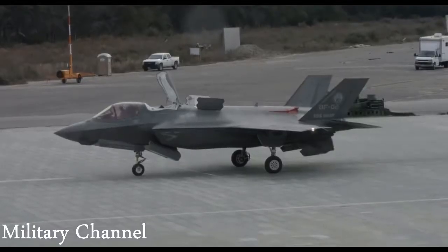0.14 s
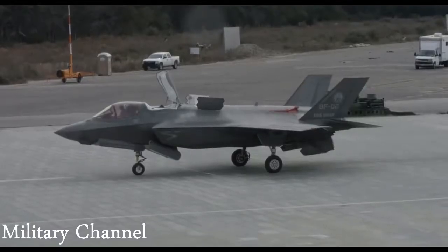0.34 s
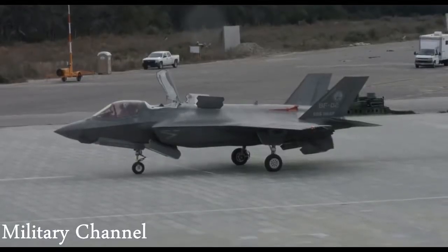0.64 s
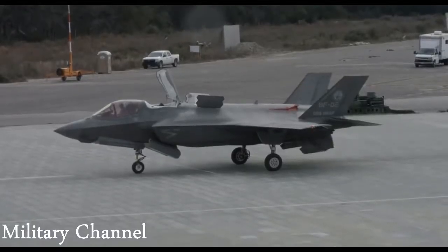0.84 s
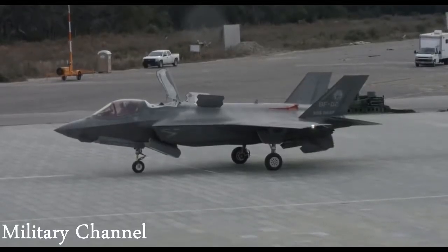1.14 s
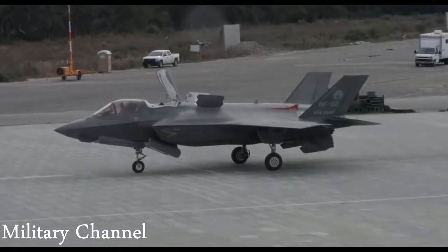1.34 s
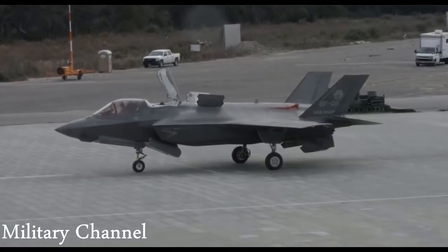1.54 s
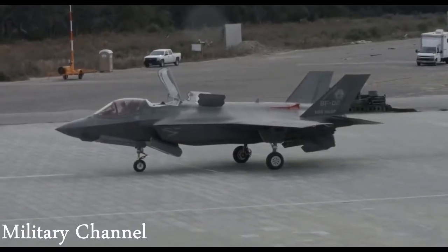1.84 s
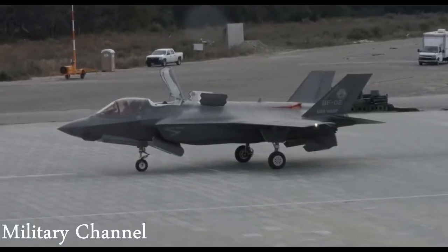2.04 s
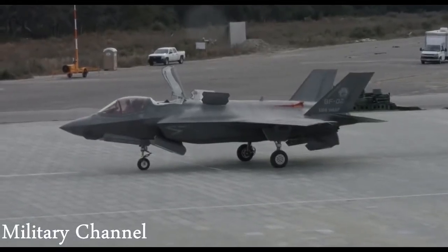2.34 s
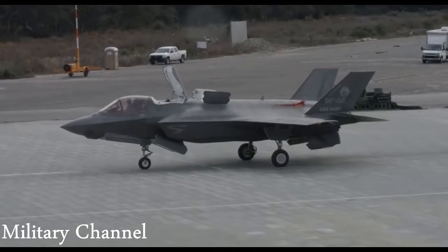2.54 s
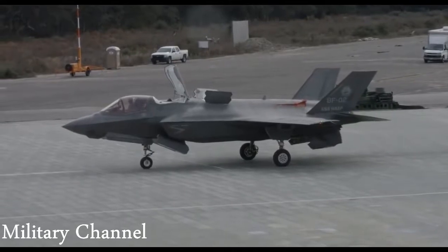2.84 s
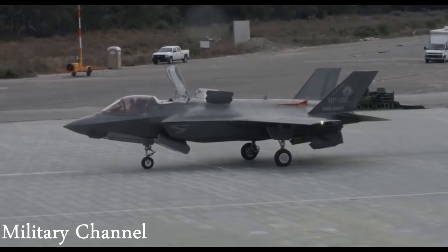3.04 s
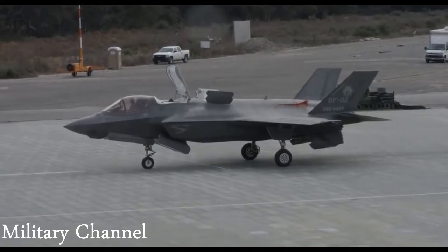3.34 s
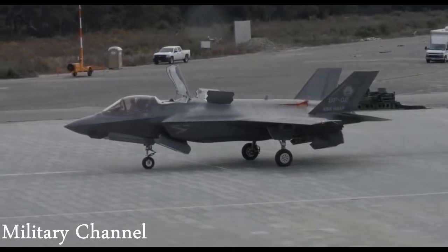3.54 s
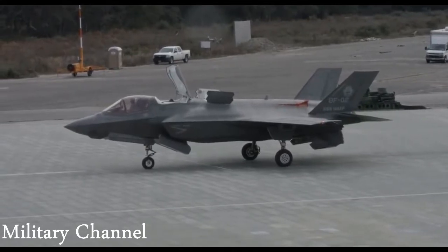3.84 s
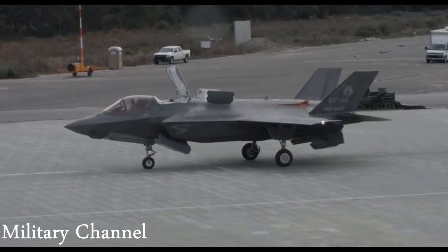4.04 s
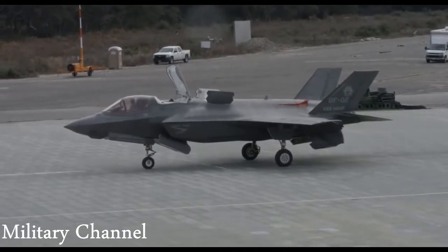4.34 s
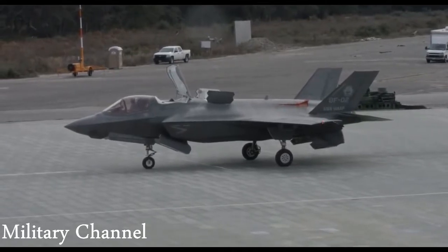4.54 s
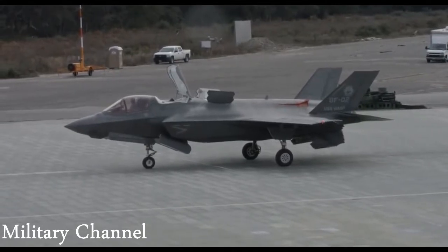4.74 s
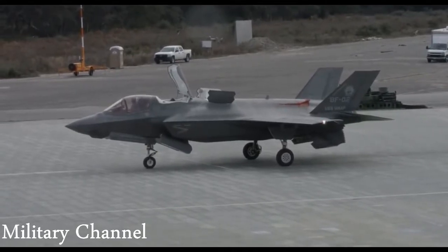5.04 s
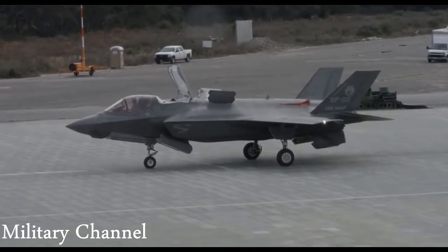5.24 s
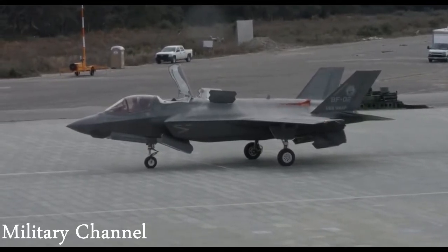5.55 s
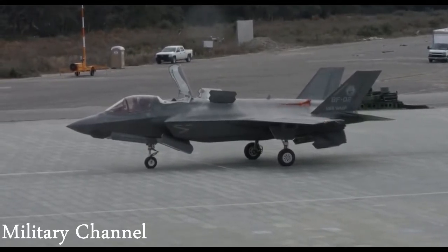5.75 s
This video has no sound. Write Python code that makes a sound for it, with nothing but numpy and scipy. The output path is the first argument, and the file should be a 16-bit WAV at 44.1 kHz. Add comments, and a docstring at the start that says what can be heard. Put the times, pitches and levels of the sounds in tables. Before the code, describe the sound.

A fighter jet's engine spools up from idle across an open apron, its piercing whine climbing over hiss and a deepening exhaust roar.

```python
"""A fighter jet with its lift-fan door open spools up from idle to high power, some way off across an open apron.
Blade tones are multiples of the fan shaft's turns and climb with it; intake hiss is noise laid along the shaft angle.
Below them the exhaust roars and rumbles: shaped noise that jumps as the throttle opens.
Hot, moving air makes each tone fade in and out and the treble swell.
One microphone feeds the right channel; the left is silent.
"""
import sys
import numpy as np
from scipy import signal
from scipy.fft import rfft, irfft, next_fast_len
from scipy.io import wavfile
from scipy.ndimage import uniform_filter1d, map_coordinates

SR = 44100
rng = np.random.default_rng(int(sys.argv[2]) if len(sys.argv) > 2 else 0)


def generate_wav(sig):
    """Save sig (samples, or channels by samples) to the path in sys.argv[1] as 16-bit PCM at SR."""
    pcm = np.round(np.clip(np.atleast_2d(sig).T, -1, 1) * 32767).astype(np.int16)
    wavfile.write(sys.argv[1], SR, pcm)


N = 260631
TIME = np.arange(N) / SR

# fan shaft speed, idle, a steady climb, a slight overshoot: time_s, shaft_hz [s, turns per second]
SHAFT_SPEED = [(0.0, 99.7), (0.55, 100.3), (0.8, 101.2), (1.1, 106.2), (1.3, 110.3), (1.5, 115.5),
               (2.0, 127.7), (2.5, 140.2), (3.0, 151.2), (3.2, 154.8), (3.6, 159.6), (3.8, 160.7),
               (4.1, 160.8), (4.4, 161.5), (4.7, 160.6), (5.2, 159.2), (5.91, 159.2)]
# shaft speeds of the four power settings: idle, low, high, full [Hz]
POWER_SHAFT_HZ = [100, 122, 143, 160]
# leading blade tones, with a skirt relative to the tone:
# name, cycles_per_turn, skirt_db, idle_db, low_db, high_db, full_db [-, 1/turn, dB x5]
LEADING_TONES = [("top", 42, -6.5, -49, -44.5, -39, -41), ("upper", 38, -4, -54.5, -42, -41.5, -45),
                 ("main", 28, -8.5, -44.5, -33, -37, -37), ("under", 24, -6, -60, -56, -36.5, -46),
                 ("middle", 14, -6.5, -58.5, -46.5, -43, -46),
                 ("bottom", 12, -12, -69, -51.5, -52.5, -45.5)]
# moving air focuses a tone or bends it away: centre_s, length_s, tone_name, change_db [s, s, -, dB]
TONE_FLARES = [(0.17, .18, "main", -5), (0.57, .15, "main", 4.5), (1.05, .18, "main", 7),
               (1.18, .06, "main", -10), (1.47, .1, "main", 3), (1.65, .09, "main", 4.5),
               (1.96, .2, "bottom", 10), (2.03, .09, "main", 10), (2.13, .05, "main", -6),
               (2.2, .07, "main", 6), (2.28, .12, "upper", 9), (2.35, .25, "under", 7),
               (2.39, .1, "main", 4), (2.69, .05, "main", -12), (2.75, .12, "upper", 7),
               (2.99, .12, "top", 8), (3.0, .2, "bottom", 7), (3.07, .13, "main", 9),
               (3.33, .18, "bottom", 5), (3.36, .08, "main", 4), (3.55, .28, "under", 8),
               (3.68, .2, "top", 9), (3.72, .14, "middle", 8), (3.77, .14, "main", 6),
               (4.08, .15, "main", -9), (4.28, .16, "middle", 10), (4.4, .1, "top", 8),
               (4.43, .11, "main", 7), (4.64, .14, "bottom", 11), (4.67, .12, "main", 9),
               (5.0, .12, "under", 10), (5.03, .14, "main", 3), (5.2, .2, "top", 5), (5.24, .08, "main", 7),
               (5.3, .18, "bottom", 5), (5.53, .14, "main", -12), (5.65, .08, "main", 7)]
# weaker blade and gear tones, before a common trim:
# cycles_per_turn, idle_db, low_db, high_db, full_db [1/turn, dB x4]
WEAK_TONES = [(13.61, -57, -47, -47.5, -48), (25.54, -51.5, -36, -39, -51), (29.95, -52, -64, -45, -43.5),
              (36.26, -51, -54, -38, -43.5), (40.2, -47.5, -63, -62, -52), (39.86, -63, -45, -47, -44.5),
              (48, -54, -57, -58, -48), (50.3, -75, -49, -57, -49), (52.1, -60, -39, -52, -49.5),
              (56.4, -54, -52, -47.5, -49.5), (66, -84, -46.5, -51, -65), (69.7, -66, -51, -61, -62),
              (84, -64, -75, -69, -70)]
# turbulence chopped by the blades, before the body and treble levels:
# cycles_per_turn, idle_db_per_hz, half_db_per_hz, full_db_per_hz [1/turn, dB per Hz x3]
HISS_SPECTRA = [(3.79, -100, -100, -79.5), (8.27, -88, -81.5, -71.5), (11.9, -81, -74.5, -69),
                (19.6, -77, -73, -67), (28.3, -77.5, -63.5, -64), (32.3, -75, -70, -66),
                (41.5, -79, -67, -65.5), (45.6, -75, -71, -73), (55, -75, -72, -73), (55, -77, -74.5, -77),
                (68.7, -81, -78.5, -79.5), (71.8, -84.5, -78.5, -83.5), (82.6, -84.5, -82, -87),
                (154, -111, -113, -118)]
# shaft speeds of those three spectra: idle, half, full [Hz]
HISS_SHAFT_HZ = [100, 138.4, 162.4]
# brief swells and lulls of the hiss: centre_s, length_s, treble_change_db [s, s, dB]
HISS_SWELLS = [(0.25, .14, 3), (1.493, .14, 2.5), (1.998, 0.23, 3), (2.31, 0.15, 3.5), (3.19, 0.11, -4.5),
               (3.57, 0.082, 4.5), (3.723, 0.096, 4.5), (4.402, .07, 3.5), (4.65, 0.1, 3), (5.08, 0.093, 5),
               (5.227, .05, 3), (5.54, 0.2, -4.5)]
# level change of the hiss below 6.5 kHz: time_s, level_db [s, dB]
HISS_BODY_LEVEL = [(0, .4), (0.55, -0.1), (0.85, 3), (1.2, -1.4), (1.8, -1.2), (2.25, 0.9), (3.15, -3),
                   (3.85, 1.4), (4.7, 1), (5.9, 0.3)]
# mixing noise of the jet, shape only: pitch_hz, density_db_per_hz [Hz, dB per Hz]
ROAR_SHAPE = [(70, -9), (140, -2.5), (190, 0.5), (290, 3), (400, 2), (475, 5), (560, 2.5), (800, 1),
              (1120, -10), (1400, -20.5), (4000, -38), (12000, -48)]
# rumble of the blast on the ground, shape only: pitch_hz, density_db_per_hz [Hz, dB per Hz]
RUMBLE_SHAPE = [(12, -27), (25, -28), (48, -10.5), (65, -9), (95, -1.5), (130, -8), (185, -3), (260, -11),
                (500, -45)]
# exhaust levels with the throttle open, before the late build: idle, low, high, full [dB]
ROAR_LEVEL_DB = (-53, -51, -48.5, -46.5)
RUMBLE_LEVEL_DB = (-65, -66, -57, -57)

# each leading tone also fades at random throughout, on top of its flares: spread (dB), rate (Hz)
FADE_DB, FADE_HZ = 1.5, 6.0
# width of the leading tones' skirts (Hz)
SKIRT_HZ = 120
# eddies disturb short waves most; per cycle per turn: scattered share (0-1), scatter (Hz), phase drift (rad)
SCATTER_PER_ORDER, SCATTER_HZ_PER_ORDER, DRIFT_PER_ORDER = .011, .9, .028
# a focused tone is purer: its scattered share shrinks by this many dB per dB of flare
FOCUS_PURITY = .7
# the main tone turns ragged around a shaft speed (Hz), over a range (Hz): added scattered share, skirt (dB)
RAGGED_HZ, RAGGED_RANGE_HZ, RAGGED_SHARE, RAGGED_DB = 141, 5.4, .25, 4
# hiss above the body (dB), and the share of a swell that reaches the body (0-1)
TREBLE_DB, BODY_SHARE = -0.77, 0.038
# the throttle opens: start (s), time it takes (s)
THROTTLE_S, THROTTLE_RISE_S = 0.66, 0.28
# before it opens, roar and rumble are weaker by this much (dB)
ROAR_SHUT_DB, RUMBLE_SHUT_DB = 3, 7
# at full power the roar goes on building: start (s), slope (dB per s)
BUILD_S, BUILD_DB_PER_S = 3.75, 0.5
# steep upper limit of the recorded sound (Hz)
TOP_HZ = 15000


def undb(db):
    """Decibels to gain."""
    return 10 ** (np.asarray(db) / 20)


def curve(table):
    """The second column of a table over time in seconds, joined by straight lines."""
    time_s, values = np.transpose(table)
    return np.interp(TIME, time_s, values)


def bump(centre_s, length_s):
    """A smooth rise and fall, length_s wide at half its height."""
    return .5 ** ((2 * (TIME - centre_s) / length_s) ** 2)


def noise(points, size):
    """Noise whose density follows (Hz, dB per Hz) points, silent outside them."""
    hz, db = np.transpose(points)
    length = next_fast_len(size, True)
    f = np.maximum(np.fft.rfftfreq(length, 1 / SR), 1)
    gain = undb(np.interp(np.log(f), np.log(hz), db, left=-np.inf, right=-np.inf))
    spectrum = rfft(rng.standard_normal(length)) * gain * np.sqrt(SR / 2)
    return irfft(spectrum, length)[:size]


def flutter(width_hz, order=2, size=32):
    """Complex random wavering of unit power, with rates up to about width_hz."""
    count = N // size + 2  # one point every `size` samples
    f = np.fft.fftfreq(count, size / SR)
    white = rng.standard_normal(count) + 1j * rng.standard_normal(count)
    slow = np.fft.ifft(white / np.sqrt(1 + (f / width_hz) ** (2 * order)))
    return np.interp(np.arange(N) / size, np.arange(count), slow / np.std(slow))


def walk(rate_hz):
    """Real random wavering of unit spread."""
    return np.sqrt(2) * flutter(rate_hz).real


def blade_tone(turns, order, db, scatter, scatter_hz, skirt_db, skirt_hz, drift):
    """One shaft multiple: a steady part, a part scattered by eddies, and a wide skirt from uneven inflow."""
    scatter = np.clip(scatter, 0, 1)
    steady = np.sqrt(1 - scatter) * np.exp(1j * drift * walk(2.8))
    scattered = np.sqrt(scatter) * flutter(scatter_hz)
    line = undb(db) * (steady + scattered)
    # the skirt comes from the whole intake, so it misses the brief fades
    skirt = undb(uniform_filter1d(db, SR // 3) + skirt_db) * flutter(skirt_hz)
    carrier = np.exp(2j * np.pi * order * turns)
    return np.sqrt(2) * np.real((line + skirt) * carrier)


def leading_tones(shaft_hz, turns):
    """The strong blade tones: power setting gives their level, moving air focuses, fades and scatters them."""
    out = np.zeros(N)
    for name, order, skirt_db, *levels_db in LEADING_TONES:
        flares_db = sum(change_db * bump(centre_s, length_s)
                        for centre_s, length_s, tone, change_db in TONE_FLARES if tone == name)
        power_db = np.interp(shaft_hz, POWER_SHAFT_HZ, levels_db)
        db = power_db + flares_db + FADE_DB * walk(FADE_HZ)
        ragged = (name == "main") * np.exp(-((shaft_hz - RAGGED_HZ) / RAGGED_RANGE_HZ) ** 2)
        purity = undb(-FOCUS_PURITY * np.maximum(flares_db, 0))
        scatter = SCATTER_PER_ORDER * order * purity + RAGGED_SHARE * ragged
        out += blade_tone(turns, order, db, scatter, scatter_hz=SCATTER_HZ_PER_ORDER * order,
                          skirt_db=skirt_db + RAGGED_DB * ragged, skirt_hz=SKIRT_HZ,
                          drift=DRIFT_PER_ORDER * order)
    return out


def side_tones(shaft_hz, turns):
    """Weaker blade and gear tones: shorter waves are scattered more, faster and more widely."""
    out = np.zeros(N)
    for order, *levels_db in WEAK_TONES:
        power_db = np.interp(shaft_hz, POWER_SHAFT_HZ, levels_db)
        db = power_db + 2.1 * walk(5.2) - 2  # random fades and the common trim
        skirt_db = np.interp(order, [14, 50], [-9, -2])
        out += blade_tone(turns, order, db, scatter=order / 55, scatter_hz=.8 * order,
                          skirt_db=skirt_db, skirt_hz=4 * order, drift=.9)
    return out


def intake_hiss(shaft_hz, turns):
    """Noise laid out along the shaft angle: its humps and edges rise with the speed."""
    orders, *spectra = np.transpose(HISS_SPECTRA)
    idle_hz = POWER_SHAFT_HZ[0]
    place = turns * SR / idle_hz  # reading position in noise made at idle speed
    hiss = np.zeros(N)
    for db, share in zip(spectra, np.eye(len(spectra))):
        at_idle = noise(np.c_[orders * idle_hz, db], size=int(place[-1]) + 2)
        # cross-fade the spectra; the speed factor offsets the stretch of the spectrum
        power = np.interp(shaft_hz, HISS_SHAFT_HZ, share) * shaft_hz / idle_hz
        hiss += np.sqrt(power) * map_coordinates(at_idle, [place], order=3)
    body = signal.sosfiltfilt(signal.butter(2, 6500, fs=SR, output="sos"), hiss)
    treble = hiss - body
    swell_db = sum(change_db * bump(centre_s, length_s) for centre_s, length_s, change_db in HISS_SWELLS)
    body_db = curve(HISS_BODY_LEVEL) + BODY_SHARE * swell_db
    treble_db = TREBLE_DB + swell_db
    # eddies in the path shake the short waves more than the long ones
    shimmer = walk(28)
    return body * undb(body_db + 0.55 * shimmer) + treble * undb(treble_db + 0.84 * shimmer)


def exhaust(shaft_hz):
    """The jet's roar and the rumble under it, both churning; they jump with the throttle and follow the speed."""
    shut = 1 - np.clip((TIME - THROTTLE_S) / THROTTLE_RISE_S, 0, 1)
    build_db = BUILD_DB_PER_S * np.maximum(TIME - BUILD_S, 0)
    roar_db = np.interp(shaft_hz, POWER_SHAFT_HZ, ROAR_LEVEL_DB) - ROAR_SHUT_DB * shut + build_db
    rumble_db = np.interp(shaft_hz, POWER_SHAFT_HZ, RUMBLE_LEVEL_DB) - RUMBLE_SHUT_DB * shut
    roar = noise(ROAR_SHAPE, size=N)
    rumble = noise(RUMBLE_SHAPE, size=N)
    churning_roar = roar / np.std(roar) * undb(roar_db + 1.0 * walk(21))
    churning_rumble = rumble / np.std(rumble) * undb(rumble_db + 1.05 * walk(7))
    return churning_roar + churning_rumble


def stray_paths(x, stray_db, rate_hz, count=8):
    """Eddies bend sound along slightly longer paths that come and go, so its colour keeps shifting."""
    lags_s = rng.uniform(.0003, .006, count)
    stray = np.zeros(N)
    for lag_s in lags_s:
        late = np.pad(x, (int(lag_s * SR), 0))[:N]
        stray += walk(rate_hz) * late / np.sqrt(count)
    return (x + undb(stray_db) * stray) / np.hypot(1, undb(stray_db))


def scene():
    """The whole aircraft, heard from one place across the apron."""
    shaft_hz = curve(SHAFT_SPEED)
    turns = np.cumsum(shaft_hz) / SR
    whine = leading_tones(shaft_hz, turns) + side_tones(shaft_hz, turns)
    rush = intake_hiss(shaft_hz, turns) + exhaust(shaft_hz)
    jet = whine + stray_paths(rush, stray_db=-11.5, rate_hz=6.6)
    return np.array([jet, jet])


def record(dry):
    """One microphone feeds the right channel, the left is silent; the top is cut steeply."""
    wired = dry * np.array([[0], [1]])
    top_cut = signal.ellip(12, .1, 90, TOP_HZ, fs=SR, output="sos")
    return signal.sosfilt(top_cut, wired)


dry = scene()
out = record(dry)
generate_wav(out)
```